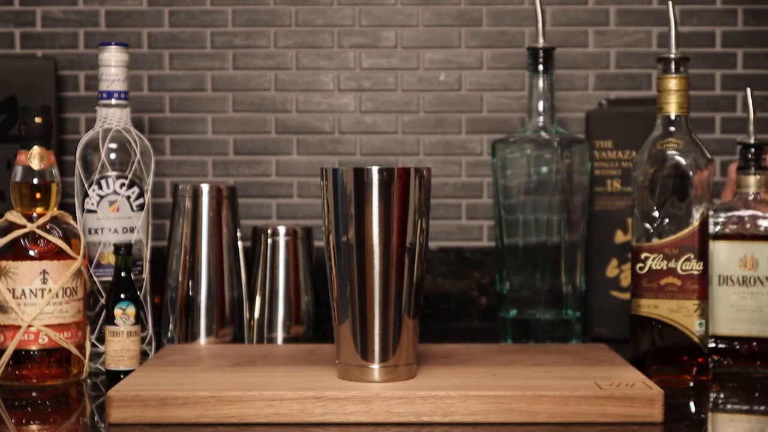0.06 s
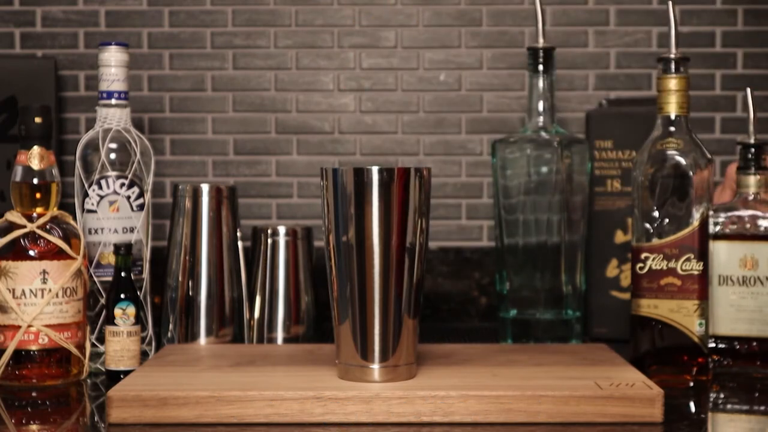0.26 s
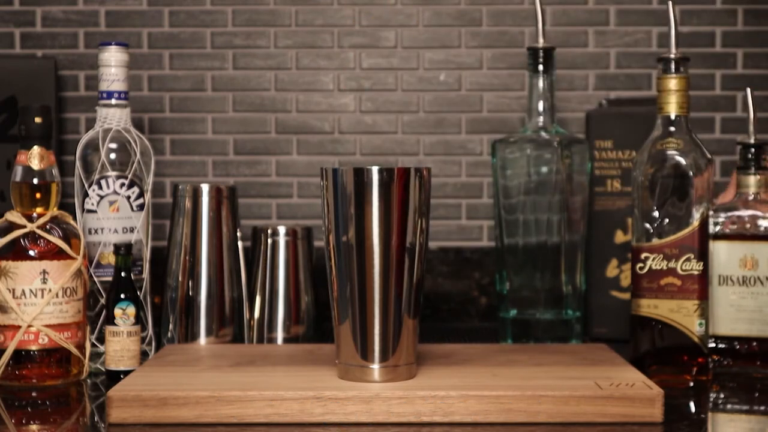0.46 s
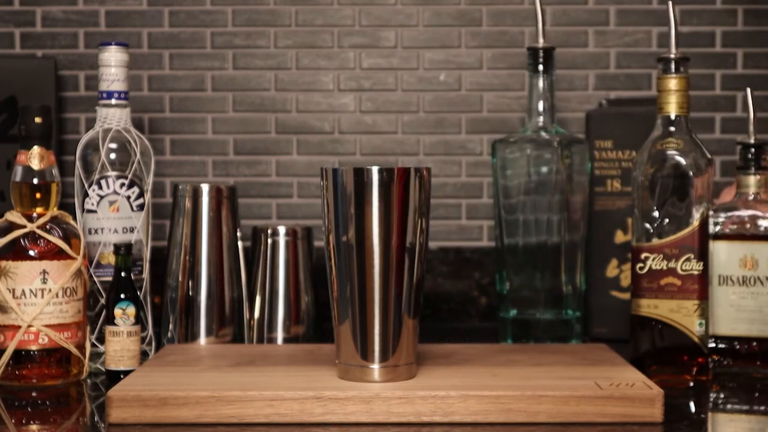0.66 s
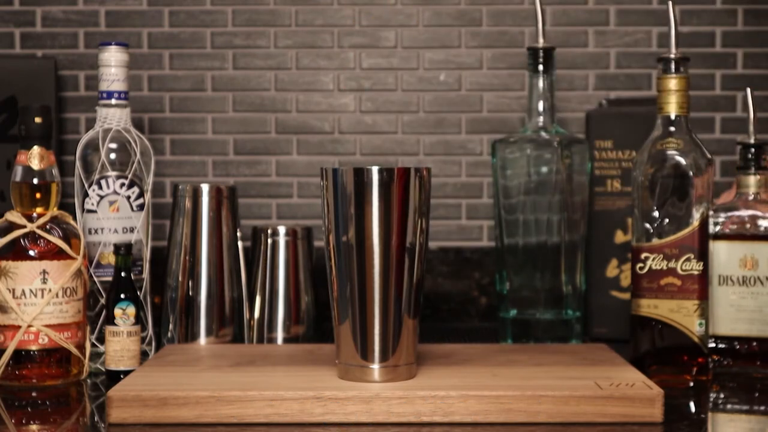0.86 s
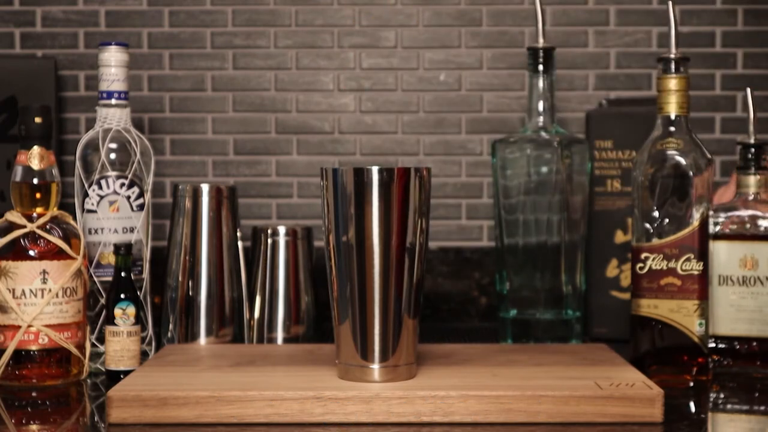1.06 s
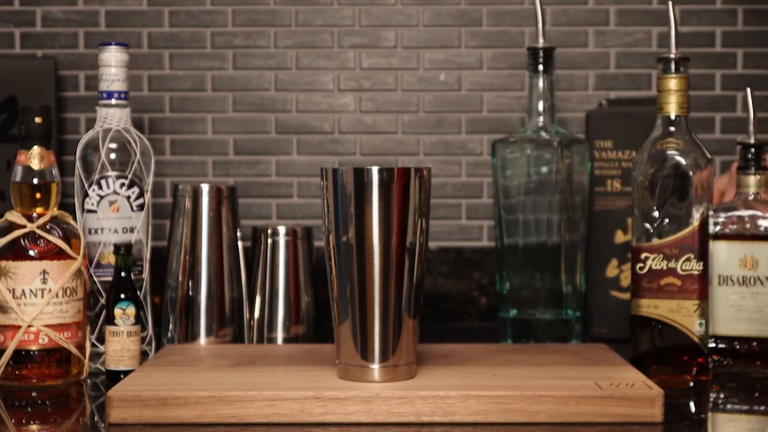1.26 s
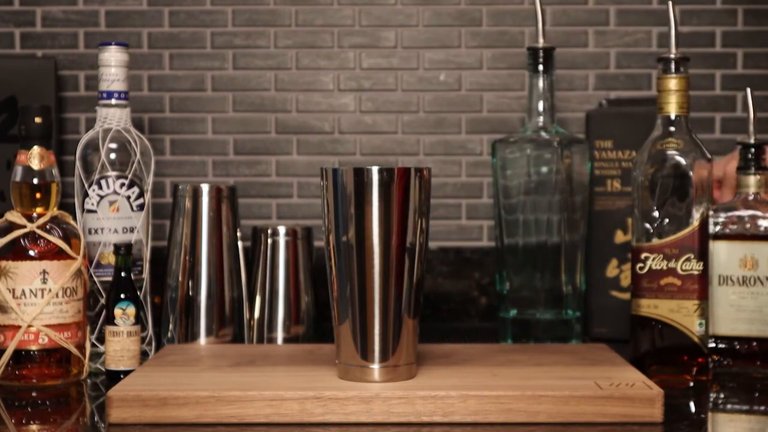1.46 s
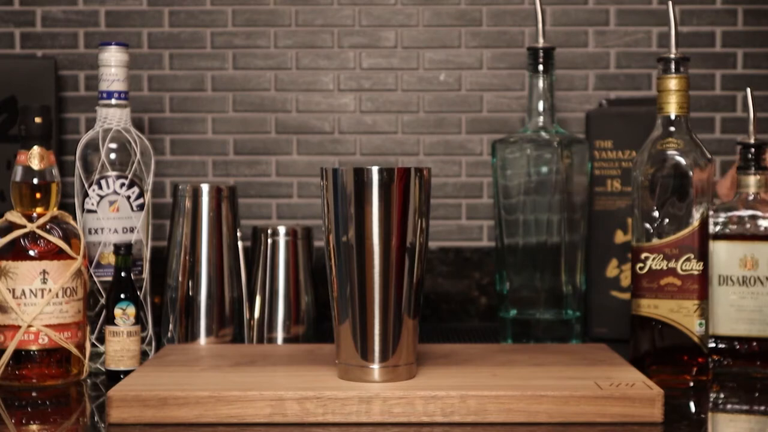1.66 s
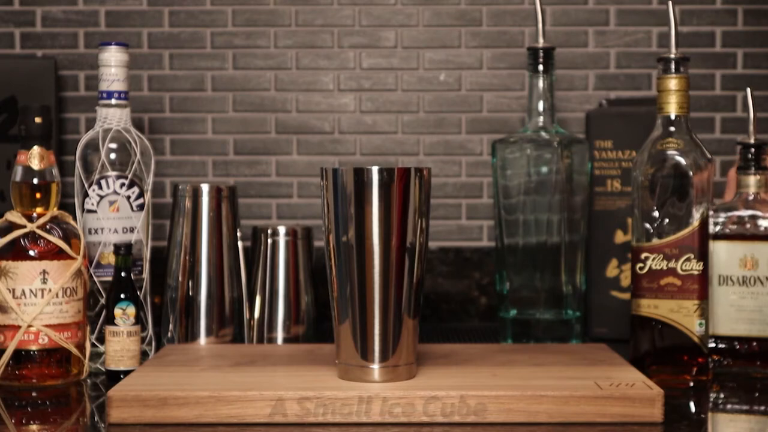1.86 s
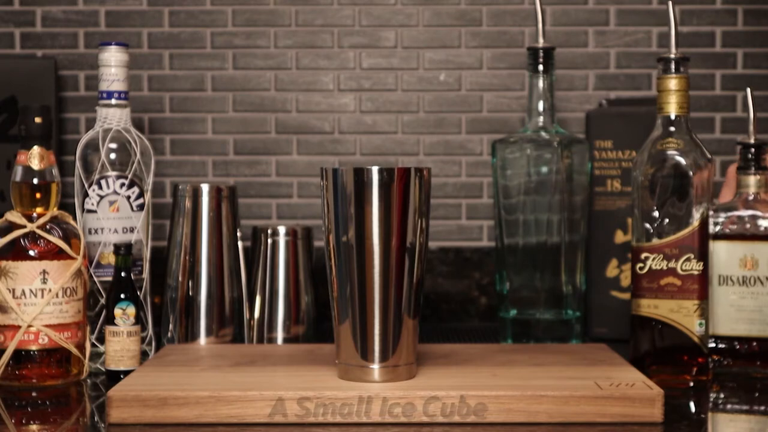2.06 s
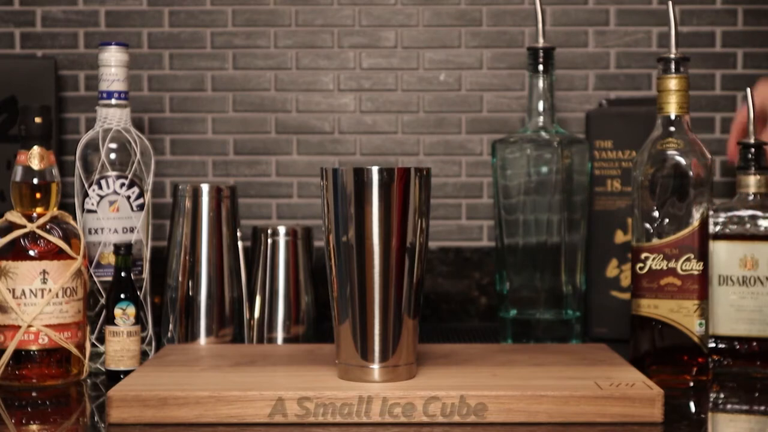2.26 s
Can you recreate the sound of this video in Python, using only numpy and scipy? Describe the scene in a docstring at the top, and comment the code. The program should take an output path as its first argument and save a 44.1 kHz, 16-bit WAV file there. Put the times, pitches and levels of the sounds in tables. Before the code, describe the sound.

Ice shifts and rattles in a metal shaker, with one dull thud on the counter.

```python
"""Ice in a metal vessel at a bar counter, close to a stereo pair of microphones in a small, hard room.
Over faint room air, the cubes crunch and knock from the start, each knock a short rattle that rings the
metal. They grind along the wall and crack loudly near 0.25 s, then again from 0.6 to 0.75 s.
After a lull one cube squeaks, more knocks follow, and near 1.6 s a heavy bump thuds through the counter.
Small pieces settle with light ticks to the end."""
import sys
import numpy as np
from scipy import signal
from scipy.fft import rfft, irfft, next_fast_len
from scipy.io import wavfile
from scipy.ndimage import uniform_filter1d

SR = 44100
rng = np.random.default_rng(int(sys.argv[2]) if len(sys.argv) > 2 else 0)


def materialize(psi):
    """Save the field psi as 16-bit PCM at rate SR to the path in sys.argv[1].

    A 1-D psi becomes a single channel; in a 2-D psi each row is a channel.
    """
    bounded = np.clip(np.atleast_2d(psi).T, -1, 1)
    quanta = np.round(bounded * 32767).astype(np.int16)
    wavfile.write(sys.argv[1], SR, quanta)


N = 101429


def amp(db):
    """Decibels to gain."""
    return 10 ** (np.asarray(db) / 20)


def unit(x):
    """Scales to rms 1."""
    return x / np.sqrt(np.mean(x ** 2) + 1e-20)


def read(points, hz):
    """Reads a table on a log-frequency axis."""
    f, value = np.transpose(points)
    return np.interp(np.log(hz + 1), np.log(f + 1), value)


def add(mix, start, sound):
    """Mixes a sound in at a start time in seconds."""
    part = mix[max(round(start * SR), 0):][:len(sound)]
    part += sound[:len(part)]


def colour(x, points):
    """Causal filter with the given dB curve."""
    log_gain = np.log(amp(read(points, abs(np.fft.fftfreq(4096, 1 / SR)))))
    taps = np.fft.ifft(np.exp(np.conj(signal.hilbert(log_gain)))).real
    return signal.fftconvolve(x, taps[:len(taps) // 2])[:len(x)]


def band_pass(x, band_hz):
    """Keeps one band of a sound."""
    edges = np.clip(band_hz, 50, SR / 2 - 100)
    return signal.sosfilt(signal.butter(3, edges, "band", fs=SR, output="sos"), x)


def pair(a, b, likeness):
    """Left and right from two unrelated signals, alike by the given table."""
    size = next_fast_len(len(a), True)
    same = np.clip(read(likeness, np.fft.rfftfreq(size, 1 / SR)), -1, 1)
    mid = rfft(a, size) * np.sqrt((1 + same) / 2)
    side = rfft(b, size) * np.sqrt((1 - same) / 2)
    return irfft(np.array([mid + side, mid - side]), size)[:, :len(a)]


def clicks(size, per_s, spread_db):
    """Random clicks: many small, a few large."""
    heights = amp(spread_db * np.minimum(rng.exponential(1, size), 4))
    return heights * rng.choice([-1, 1], size) * (rng.random(size) < per_s / SR)


def strike(t, rise_s, t60, hold_s=0):
    """Envelope of a blow: a quick rise, then a fall of 60 dB in t60 seconds."""
    return np.minimum(t / rise_s, 1) * np.exp(-np.log(1000) * np.maximum(t - hold_s, 0) / t60)


# The quiet room around the microphones. Each row: frequency in Hz, relative level in dB.
AIR_COLOUR = [(20, -10.5), (55, 2), (150, 4), (280, -3.5), (600, -17), (2000, -65), (8000, -27),
              (16000, -6.5)]
# The room across the two microphones. Each row: frequency in Hz, left-right likeness from 0 to 1.
ROOM_LIKENESS = [(160, .98), (350, .65), (1500, .62), (3000, .62), (6000, .25), (12000, 0)]


def air(level_db=-63.5, swell_db=1.5, swell_s=0.076):
    """The faint rumble and hiss of the room, wavering a little."""
    size = next_fast_len(N, True)
    hz = np.fft.rfftfreq(size, 1 / SR)
    noise = irfft(rfft(rng.standard_normal((2, size))) * amp(read(AIR_COLOUR, hz)), size)
    swell = unit(irfft(rfft(rng.standard_normal(size)) * np.exp(-(hz * swell_s) ** 2), size))
    return amp(level_db) * unit(pair(*noise, ROOM_LIKENESS) * amp(swell_db * swell))[:, :N]


# Ice shifting in the vessel. Each row: time in seconds, level in dB.
CRUNCH_LEVELS = [(0, -41.5), (0.059, -50.5), (.1, -44.5), (.2, -52), (0.302, -36), (.4, -60.5),
                 (0.548, -58.5), (0.615, -37), (.68, -52), (.8, -47), (.87, -61), (0.989, -54),
                 (1.049, -66.5), (1.15, -58), (1.202, -38.5), (1.35, -43), (1.43, -37.5), (1.56, -33.5),
                 (1.648, -39.5), (1.7, -76), (1.82, -56), (1.91, -58), (2.001, -40.5), (2.12, -63),
                 (2.17, -80), (2.23, -66), (2.3, -77)]
# Its grains from close by. Each row: frequency in Hz, relative level in dB.
GRAIN_COLOUR = [(100, -39.5), (350, -21.5), (490, 4), (660, 0.5), (820, -6.5), (1250, 6), (1750, -5),
                (2600, 3.5), (5700, 0), (7800, -8), (10500, -11), (16000, -37.5)]


def crunch(clump_db=5, clump_s=0.008, pressed_db=-48):
    """Cubes catch and slip on each other in clumps of fine grains; the low body comes with pressure."""
    level_db = np.interp(np.arange(N) / SR, *np.transpose(CRUNCH_LEVELS))
    clumps = unit(signal.lfilter([1], [1, -np.exp(-1 / (clump_s * SR))], rng.standard_normal(N)))
    slips = clicks(N, per_s=1400, spread_db=0.5) * amp(clump_db * clumps)
    grains = unit(colour(slips, GRAIN_COLOUR))
    body = signal.sosfiltfilt(signal.butter(3, 2000, fs=SR, output="sos"), grains)
    body_gain = amp(0.7 * np.minimum(level_db - pressed_db, 0))
    return amp(level_db) * (grains - body + body * body_gain)


# The ice's four bands: hollow, knock, clink, snap. Each row: low edge in Hz, high edge in Hz.
ICE_BANDS = [(400, 887), (850, 1970), (2150, 5000), (7500, 21500)]
# How those bands die away. Each row: t60 in seconds, trim in dB.
BAND_DECAYS = [(0.076, -6), (0.047, -4.5), (0.062, -1.5), (0.05, 0)]


def rattle(levels_db, hard_snap_db=-20, fizz_hz=(12000, 15800)):
    """One burst of tiny fractures and contacts; a hard crack also splinters into a high fizz."""
    t, out = np.arange(SR // 10) / SR, 0
    snap_db = levels_db[-1]
    fizz_db = snap_db - 13 + 1.8 * max(snap_db - hard_snap_db, 0)
    chips = unit(clicks(len(t), per_s=3000, spread_db=2)) + 0.8 * rng.standard_normal(len(t))
    decays = BAND_DECAYS + BAND_DECAYS[-1:]  # the fizz dies like the snap
    for band, db, (t60, trim_db) in zip(ICE_BANDS + [fizz_hz], [*levels_db, fizz_db], decays):
        fade = strike(t, rise_s=0.00041, t60=t60, hold_s=0.0015)
        out += amp(db + trim_db) * np.std(fade) * unit(band_pass(chips * fade, band))
    return out


# Knocks in the vessel. Each row: start in seconds, then hollow, knock, clink and snap levels in dB.
ICE_KNOCKS = [(.003, -50, -36.5, -33, -35.5), (.032, -68, -52, -70, -33.5), (.082, -42, -36, -36, -41),
              (.152, -39, -34.5, -31.5, -39.5), (.219, -24.5, -29, -29.5, -38),
              (0.2234, -30, -29, -23.5, -28.5), (.248, -22.5, -21.5, -24, -31.5),
              (.2685, -19, -17, -18.5, -16), (0.2733, -37, -26, -19, -56), (.607, -22.5, -18.5, -21.5, -25),
              (0.7176, -41, -25.5, -30, -31.5), (0.7321, -41, -18, -20.5, -19.5),
              (.738, -29, -16, -20, -22.5), (.777, -36, -37, -29.5, -43), (1.11, -66, -47.5, -51.5, -80),
              (1.161, -48.5, -42.5, -53, -57), (1.176, -48, -42, -41, -46), (1.24, -40, -48, -36, -30),
              (1.4031, -30.5, -25.5, -22.5, -20), (1.534, -33.5, -34, -28.5, -37),
              (1.58, -21, -23.5, -24.5, -30.5), (1.5836, -30, -25.5, -25, -31.5),
              (1.619, -21, -20, -21.5, -26.5), (1.753, -65, -41.5, -24.5, -31.5)]
# Knocks, scrapes and ticks from close by. Each row: frequency in Hz, gain in dB.
ICE_TONE = [(300, -2), (560, 0), (800, -4), (1200, 3), (1750, -3.5), (2700, 1.5), (4000, 0.5), (6200, 7),
            (8000, 1.5), (10500, 1), (12500, -6.5), (15500, -16)]


def knocks():
    """Cubes crack and knock against each other, one short rattle each time."""
    out = np.zeros(N)
    for start, *levels_db in ICE_KNOCKS:
        add(out, start, rattle(levels_db))
    return colour(out, ICE_TONE)


# Modes of the metal wall. Each row: frequency in Hz, gain in dB, t60 in seconds.
WALL_MODES = [(571, -1.5, .17), (624, 0, .18), (668, 0, .2), (1036, 1, .22), (1237, -1, .2), (1527, 0, .18),
              (2274, 1, .3), (2638, 2, .22), (2898, 3, .26), (3656, 2, .3), (3858, 1, .25), (5163, 1, .28)]


def vessel(ice, ring_db=0.5):
    """The metal wall rings along with the ice."""
    t, ring = np.arange(SR // 2) / SR, 0
    for hz, db, t60 in WALL_MODES:
        damping = np.log(1000) / t60
        ring += amp(db) * 2 * damping / SR * np.exp(-damping * t) * np.cos(2 * np.pi * hz * t)
    return ice + amp(ring_db) * signal.fftconvolve(ice, ring)[:N]


# Notes of a cube or the wall. Each row: start in seconds, pitch in Hz, level in dB, t60 in seconds.
CLINK_NOTES = [(.003, 2570, -41.5, 0.19), (.003, 3871, -34, 0.086), (.076, 650, -37, 0.16),
               (.219, 662, -26, 0.15), (.27, 568, -28, 0.3), (.27, 2272, -30, .16), (.27, 2636, -27, .17),
               (.27, 3862, -26, .21), (.607, 525, -21, .035), (.734, 1028, -28, .13),
               (1.406, 2630, -35, 0.079), (1.755, 2700, -32.5, .18), (1.755, 2733, -35, 0.39)]


def clinks(right_db=-1.5):
    """Depending on where it lands, a blow leaves clear notes ringing, a little left of centre."""
    t, out = np.arange(SR // 3) / SR, np.zeros(N)
    for start, hz, db, t60 in CLINK_NOTES:
        add(out, start, amp(db) * strike(t, rise_s=0.0015, t60=t60) * np.sin(2 * np.pi * hz * t))
    return band_pass(out, band_hz=(420, 8000)) * amp([[0], [right_db]])


# Ice on the wall. Each row: start and length in seconds, then hollow, knock, clink and snap levels in dB.
WALL_SCRAPES = [(.055, 0.058, -54, -42.5, -49, -58.5), (0.585, 0.023, -39.5, -39.5, -41, -45.5),
                (.755, 0.063, -51.5, -38.5, -33, -37.5), (1.622, .055, -42.5, -36.5, -32.5, -39)]


def scrapes():
    """A cube grinds along the wall: dense, even grains that swell and ebb with no sharp attack."""
    out = np.zeros(N)
    for start, length, *levels_db in WALL_SCRAPES:
        t = np.arange(0, length, 1 / SR)
        grains = clicks(SR, per_s=6000, spread_db=0.5)[:len(t)]
        for band, db in zip(ICE_BANDS, levels_db):
            add(out, start, amp(db) * np.sin(np.pi * t / length) * unit(band_pass(grains, band)))
    return colour(out, ICE_TONE)


# Soft and heavy bumps on the counter. Each row: start in seconds, level in dB.
BUMPS = [(0.268, -48.5), (1.421, -54.5), (1.581, -27.5), (1.62, -37.5), (1.654, -51)]
# The body of the counter. Each row: frequency in Hz, relative level in dB.
COUNTER_COLOUR = [(25, -36), (60, -17), (90, -9), (130, 1.5), (200, -5.5), (320, -4), (450, -6),
                  (1000, -46), (4000, -102)]


def thuds():
    """Bumps shake the counter with a short, dull rumble."""
    t, out = np.arange(SR // 5) / SR, np.zeros(N)
    fade = strike(t, rise_s=0.0023, t60=0.18)
    for start, db in BUMPS:
        rumble = colour(rng.standard_normal(len(t)) * fade, COUNTER_COLOUR)
        add(out, start, amp(db) * rumble * np.linalg.norm(fade) / np.linalg.norm(rumble))
    return out


# Small pieces in the vessel. Each row: start in seconds, level in dB.
SETTLING_TICKS = [(.592, -37.5), (.66, -32), (1.186, -28), (1.277, -31), (1.334, -33), (1.505, -40),
                  (1.469, -31.5), (1.663, -27.5), (1.838, -33), (1.935, -42), (1.954, -39), (1.973, -29.5),
                  (2.041, -34.5), (2.095, -33), (2.253, -44.5)]


def ticks(band_offsets_db=(-18.5, -13, 0.5, -9.5)):
    """Small pieces settle with light rattles, strongest in the clink band."""
    out = np.zeros(N)
    for start, db in SETTLING_TICKS:
        add(out, start, rattle(db + np.array(band_offsets_db)))
    return colour(out, ICE_TONE)


def squeak(start_s=1.238, length_s=0.038, start_hz=5100, glide_hz_per_s=33000, db=-36, octave_db=-4.5):
    """Ice under load sticks and slips ever faster: a rough, rising chirp with its octave."""
    t, out = np.arange(0, length_s, 1 / SR), np.zeros(N)
    jitter = unit(uniform_filter1d(rng.standard_normal(SR // 4), size=10))[:len(t)]
    hz = (start_hz + glide_hz_per_s * t) * (1 + 0.06 * jitter)
    phase = 2 * np.pi * np.cumsum(hz) / SR
    swell = np.sqrt(abs(np.sin(np.pi * t / length_s)))
    add(out, start_s, amp(db) * swell * (np.sin(phase) + amp(octave_db) * np.sin(2 * phase)))
    return out


# The small, hard room around the counter. Each row: frequency in Hz, t60 in seconds.
ROOM_DECAY = [(100, 0.084), (250, 0.16), (700, 0.27), (1700, 0.3), (4500, 0.41), (8000, 0.29),
              (14000, 0.27)]
# Its echoes at the microphones. Each row: frequency in Hz, gain in dB.
ROOM_COLOUR = [(120, -1.5), (600, 2), (1700, 0.5), (4500, 0), (8000, 5), (14000, -5.5)]


def room_tail(rise_s=0.0082):
    """A stereo tail of dense echoes, each band dying at its own speed."""
    hz, t, noise = signal.stft(rng.standard_normal((2, SR // 2)), SR, nperseg=256)
    damping = np.log(1000) / read(ROOM_DECAY, hz)[:, None]
    fade = np.exp(-damping * t) * np.sqrt(2 * damping / SR)
    tail = signal.istft(noise * fade * amp(read(ROOM_COLOUR, hz))[:, None], SR, nperseg=256)[1]
    rise = np.minimum(np.arange(tail.shape[1]) / SR / rise_s, 1)
    return pair(*tail, ROOM_LIKENESS) * rise


# Direct sound across the microphones. Each row: frequency in Hz, left-right likeness from 0 to 1.
DIRECT_LIKENESS = [(200, 1), (3000, .95), (6000, .8), (9000, .6), (13000, 0)]


def microphones(x, tails=3, cycle_s=0.03, left_db=-0.5, right_db=0.5):
    """Direct sound, scattered a little between the microphones, and three room tails."""
    scatter = irfft(np.exp(1j * np.angle(rfft(rng.standard_normal(128)))))  # random phase, flat level
    out = pair(x, signal.fftconvolve(x, scatter)[:N], DIRECT_LIKENESS)
    for k in range(tails):  # the tails are fed in turn in a steady cycle, smoothing the echo
        share = np.sqrt(2 / tails) * np.cos(np.pi * (np.arange(N) / SR / cycle_s + k / tails))
        out += signal.fftconvolve((x * share)[None], room_tail(), axes=1)[:, :N]
    return out * amp([[left_db], [right_db]])


def scene():
    """Ice, metal and room, heard from beside the counter."""
    ice = knocks() + ticks() + scrapes() + crunch()
    return microphones(vessel(ice) + squeak() + thuds()) + clinks() + air()


def record(dry, edge_hz=16450):
    """The recorder's band limit cuts the highest treble."""
    low_pass = signal.firwin(255, edge_hz, window=("kaiser", 8), fs=SR)
    return signal.oaconvolve(dry, low_pass[None], "same")


dry = scene()
out = record(dry)
materialize(out)
```